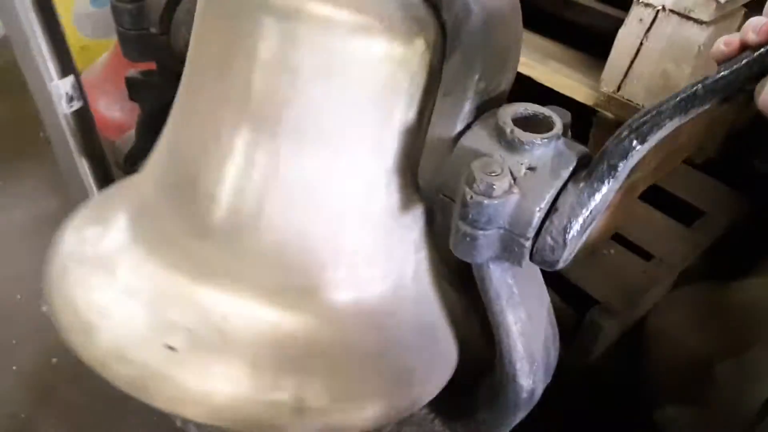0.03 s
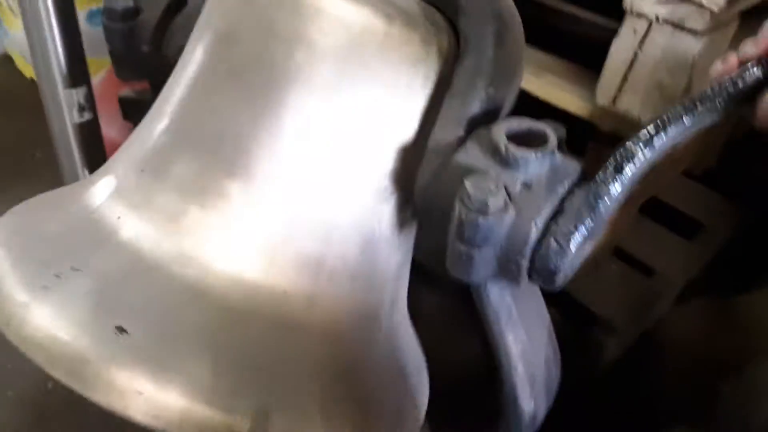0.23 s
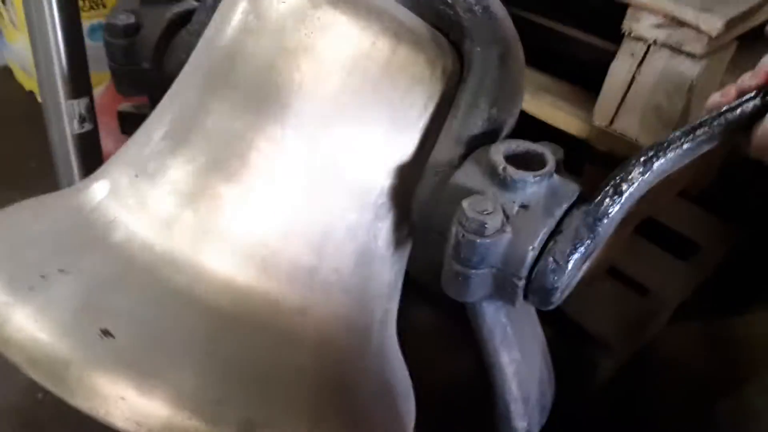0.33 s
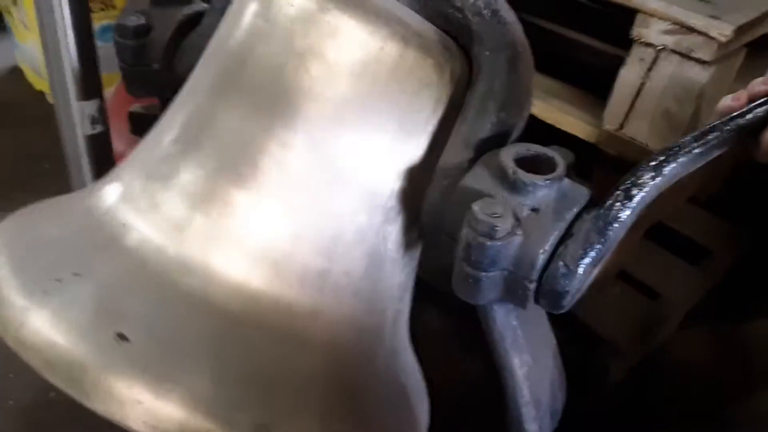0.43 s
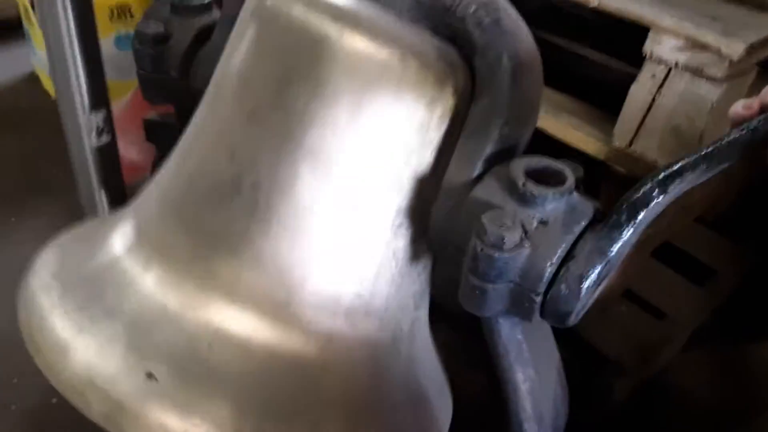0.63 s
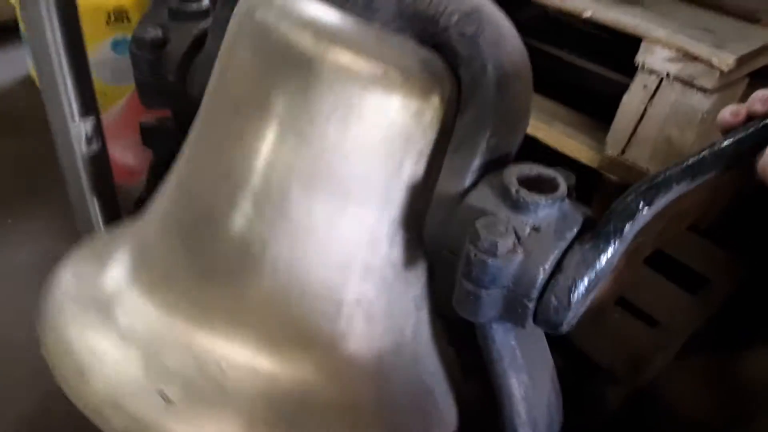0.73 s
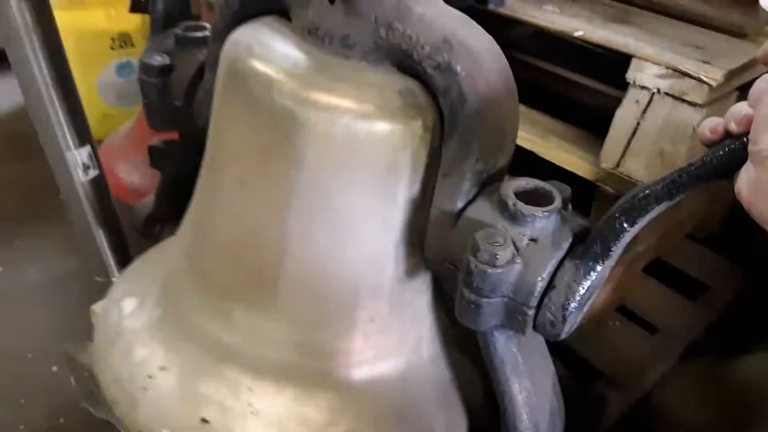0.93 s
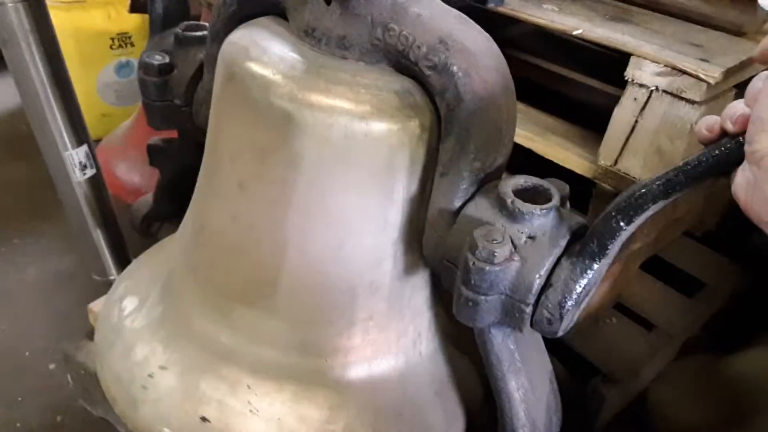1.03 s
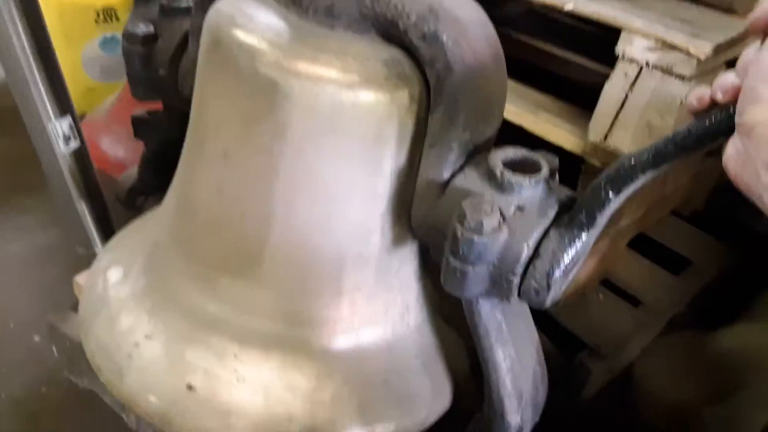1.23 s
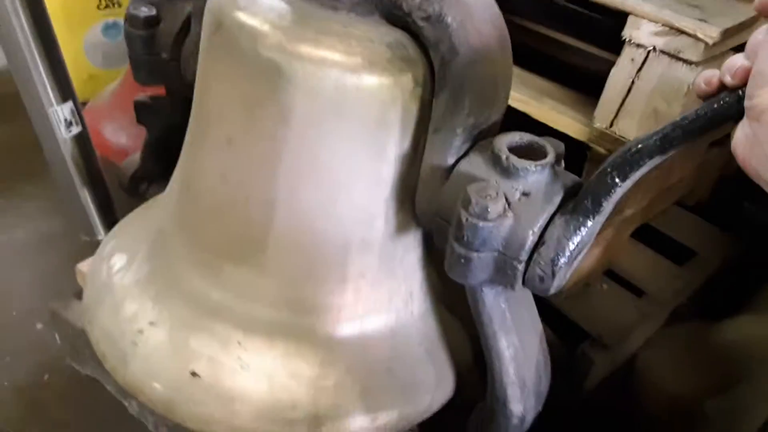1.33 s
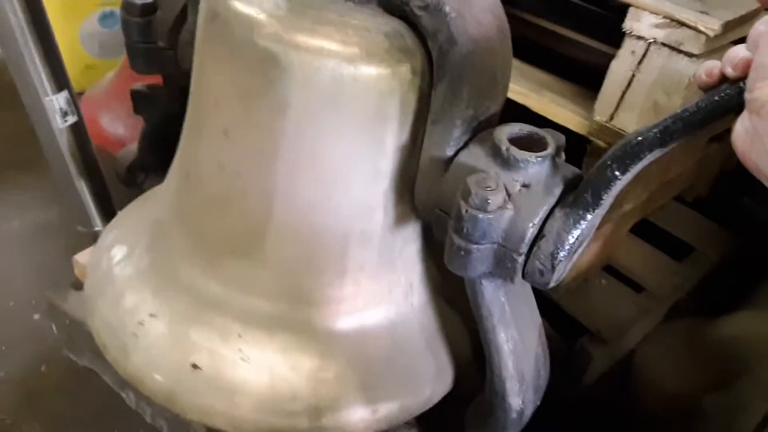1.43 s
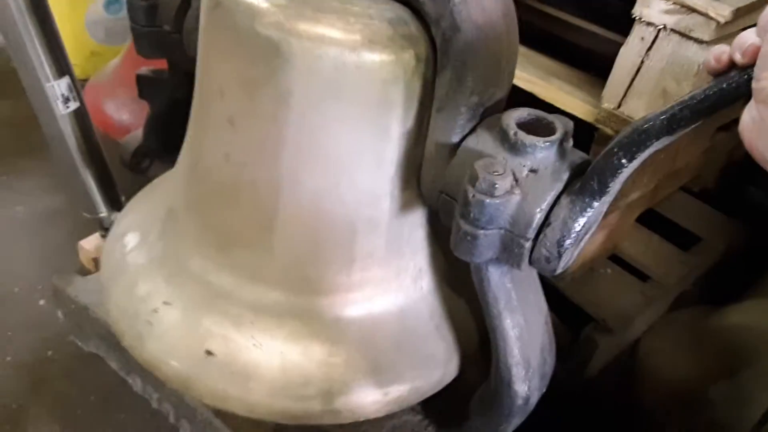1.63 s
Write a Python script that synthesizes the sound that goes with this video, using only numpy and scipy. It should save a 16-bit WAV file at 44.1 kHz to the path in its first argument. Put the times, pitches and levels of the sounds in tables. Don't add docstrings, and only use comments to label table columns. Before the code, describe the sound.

Two clangs of a brass bell, the first piercing and overloaded, the second gentler, with dull knocks

```python
import sys
import numpy as np
from scipy import signal
from scipy.io import wavfile
from scipy.ndimage import uniform_filter1d

SR = 44100
rng = np.random.default_rng(int(sys.argv[2]) if len(sys.argv) > 2 else 0)


def voltage_ratio(decibels):
    exponent = np.asarray(decibels, float) / 20
    return 10 ** exponent


def inscribe(sig):
    pcm = np.round(np.clip(np.atleast_2d(sig).T, -1, 1) * 32767)
    wavfile.write(sys.argv[1], SR, pcm.astype(np.int16))


N = 74970
HARD_S, SOFT_S = 0.223, 0.768


def read(points, hz):
    f, value = np.transpose(points)
    return np.interp(np.log(hz + 1), np.log(f + 1), value)


def after(start):
    t = np.maximum(np.arange(N) / SR - start, 0)
    return t, np.sin(np.pi / 2 * np.minimum(t / 0.0014, 1)) ** 2


# frequency in Hz, coherence from 0 to 1.
COHERENCE = [(60, 0.94), (240, 0.96), (950, 0.22), (3770, 0.08), (15000, 0.09)]


def noise(colour, t60=None):
    size = 1024 if t60 is None else 256
    hz = np.fft.rfftfreq(size, 1 / SR)
    frames = 4 * N // size + 5
    a, b, c, d = rng.standard_normal((frames, len(hz), 4)).T
    like = np.clip(read(COHERENCE, hz), -1, 1)[:, None]
    left = a + 1j * b
    right = like * left + np.sqrt(1 - like ** 2) * (c + 1j * d)
    spectrum = np.array([left, right]) * voltage_ratio(read(colour, hz))[:, None]
    rms = signal.istft(spectrum, nperseg=size)[1].std()
    if t60 is not None:
        seconds = np.arange(frames) * size / 2 / SR
        spectrum = spectrum * voltage_ratio(-60 * seconds / read(t60, hz)[:, None])
    return signal.istft(spectrum, nperseg=size)[1][:, :N] / rms


# frequency in Hz, level in dB.
HUM_COLOUR = [(18, -69), (30, -43), (92, -5.5), (251, -6.5), (445, -12.5), (868, -16.5), (932, -19),
              (1950, -20.5), (9000, -45), (11700, -85), (19800, -120)]


def hum():
    t, _ = after(HARD_S)
    duck = 1 - np.exp(-t / 0.18)
    air = noise(HUM_COLOUR)
    rumble = signal.filtfilt(*signal.butter(2, 180, fs=SR), air)
    air = air - (1 - voltage_ratio(-15 * duck)) * rumble
    port_db = np.array([[1], [-1]])
    return voltage_ratio(-42 - 15 * duck - 7.5 * t + port_db) * air


# start in seconds, level in dB.
KNOCKS = [
    (.24, -30),
    (.39, -44),
    (.87, -53),
    (1.02, -46),
    (1.16, -44),
    (1.29, -49),
    (1.37, -56),
    (.769, -43),
]
# frequency in Hz, level in dB, T60 in seconds.
YOKE_MODES = [(305, 0, .16), (135, -14, .1), (620, -7, .07), (225, -8, .1)]


def yoke():
    out = np.zeros(N)
    for start, knock_db in KNOCKS:
        t, _ = after(start)
        rise = np.minimum(t / 0.0027, 1)
        for hz, mode_db, t60 in YOKE_MODES:
            detune = rng.uniform(0.93, 1.04)
            level = voltage_ratio(knock_db + mode_db - 60 * t / t60)
            out += level * rise * np.sin(2 * np.pi * hz * detune * t)
    return out


# frequency in Hz, level in dB.
CRACK_COLOUR = [(50, -38), (250, -11), (900, -15), (1600, -1), (2300, 0), (4500, -16), (7500, -36),
                (10000, -60)]
# frequency in Hz, T60 in seconds.
CRACK_T60 = [(100, .4), (500, 0.41), (2000, 0.09), (5000, 0.45), (10000, .2)]


def crack(start, tail_db, snap_db):
    t, rise = after(start)
    tail = np.roll(noise(CRACK_COLOUR, CRACK_T60), round(start * SR), axis=1)
    snap = noise(CRACK_COLOUR) * np.exp(-t / 0.0034)
    port_gain = voltage_ratio([[0], [1.5]])
    return rise * port_gain * (voltage_ratio(tail_db) * tail + voltage_ratio(snap_db) * snap)


def haze():
    count = 60
    hz = np.geomspace(700, 6500, num=count)
    level, detune, life = rng.random((count, 3)).T
    db = -4.5 * abs(np.log2(hz / 2000)) - 4.7 * level
    t60 = 1.55 * (0.13 + life) * (1000 / hz) ** 0.3
    return list(zip(hz * (1 + 0.038 * detune), -35.5 + db, -48.5 + db, t60))


# frequency in Hz, hard-blow level in dB, soft-blow level in dB, T60 in
# seconds.
SHORT_PARTIALS = [(2486, -30, -36, .7), (2524, -31, -35, .73), (3745, -27, -38, .6), (3977, -22, -30, .55),
                  (4158, -24, -37, .6), (4477, -26, -43, .97), (4636, -35, -43, .76), (4695, -28, -41, .6),
                  (4757, -28, -45, .79), (5675, -38, -55, .88), (6367, -33, -49, 1.15), (7626, -40, -57, .85),
                  (770, -46, -58, 2.), (1114, -53, -61, 2.), (1540, -30, -48, 1.1), (5846, -37, -49, .57),
                   (6175, -44, -54, .67), (6918, -47, -58, .4), (8339, -56, -72, .8), (8936, -52, -62, .5),
                   (10287, -60, -68, .35)]
MORE_SHORT_PARTIALS = [(7200, -60, -55, .45), (7420, -60, -57, .45), (8060, -60, -55, .15), (8760, -58, -61, .4),
                       (10680, -60, -70, .3), (11650, -62, -66, .15), (3570, -32, -45, 1.2), (1145, -41, -58, 2.),
                       (5555, -50, -50, 1.), (4270, -40, -60, 1.)]


def small(start, blow):
    t = np.arange(N - round(start * SR)) / SR
    out = np.zeros((2, N))
    for hz, *blow_db, t60 in SHORT_PARTIALS + haze() + MORE_SHORT_PARTIALS:
        u = t[:round(1.2 * t60 * SR)]
        lead, place = rng.random((2, 2, 1))
        beat_hz = 1.5 + 5 * rng.random()
        sway = 1 + 0.8 * np.cos(2 * np.pi * (beat_hz * u + place))
        bloom_db = -1.5 * np.exp(-u / 0.057)
        level = voltage_ratio(blow_db[blow] + bloom_db - 60 * u / t60)
        tone = level * sway * np.sin(2 * np.pi * (hz * u + lead))
        out[:, N - len(t):][:, :len(u)] += tone
    return out * after(start)[1]


# frequency in Hz, T60 in seconds.
SIDE_HARD = [(919.61, 12.0), (955.54, 2.93), (1486.44, 1.64), (1499.57, 12.0), (2220.59, 9.98),
             (3092.33, 0.51), (3096.5, 2.74), (4093.27, 1.99), (4099.96, 9.85), (5207.18, 0.64),
             (5214.15, 0.69), (6379.94, 0.57), (5207.31, .64), (1496.51, 12.)]
SIDE_SOFT = [(925.62, 2.65), (956.39, 4.9), (1495.86, 12.0), (1497.42, 1.42), (2224.35, 1.87),
             (3104.51, 0.38), (3095.84, 1.7), (4092.98, 0.73), (4102.99, 0.86), (5198.95, 1.24),
             (5204.74, 1.06), (6389.91, 0.94), (5204.9, .98), (1504.09, 1.65)]
# left level in dB, left starting phase in turns, right level in dB,
# right starting phase in turns.
SIDE_PORTS_HARD = [(-37.0, 0.44, -46.5, 0.47), (-20.5, 0.2, -23.9, 0.63), (-19.5, 0.71, -22.5, 0.35),
                   (-28.0, 0.43, -28.5, 0.68), (-30.0, 0.98, -48.0, 0.69), (-17.0, 0.66, -8.0, 0.83),
                   (-26.0, 0.73, -30.0, 0.26), (-30.0, 0.36, -36.5, 0.69), (-35.5, 0.87, -46.0, 0.17),
                   (-16.0, 0.15, -29.0, 0.78), (-37.5, 0.39, -27.5, 0.91), (-44.5, 0.29, -32.5, 0.02),
                   (-26.0, 0.96, -29.5, .4), (-28.5, 0.01, -30.5, 0.69)]
SIDE_PORTS_SOFT = [(-44.0, 0.15, -42.0, 0.64), (-40.5, 0.42, -51.0, 0.02), (-39.0, 0.035, -49.5, 0.88),
                   (-22.5, 0.21, -29.5, 0.71), (-31.8, 0.78, -36.5, 0.85), (-19.5, 0.76, -30.5, 0.8),
                   (-43.0, 0.63, -34.5, 0.9), (-22.0, 0.63, -27.5, 0.48), (-30.5, 0.12, -28.0, 0.064),
                   (-54.5, 0.66, -38.0, 0.52), (-42.5, 0.92, -48.5, 0.76), (-52.5, 0.32, -59.5, 0.21),
                   (-37.0, .51, -44.0, .09), (-29.5, 0.5, -41.5, 1.0)]


def sides(start, tones, ports):
    t, rise = after(start)
    out = np.zeros((2, N))
    for (hz, t60), port in zip(tones, ports):
        for ch, (db, place) in enumerate(np.reshape(port, (2, 2))):
            out[ch] += voltage_ratio(db - 60 * t / t60) * np.sin(2 * np.pi * (hz * t + place))
    return out * rise


# frequency in Hz, split in Hz, T60 in seconds,
# lead of the left port in turns, its drift as the bell swings in turns per second.
RING_HARD = [(467.0, 1.42, 2.18, 0.2, -0.17), (922.0, 1.9, 11.52, 0.03, 0.1),
             (957.2, 2.07, 11.52, 0.77, -0.06), (1480.0, 6.49, 1.32, 0.59, 0.21),
             (1498.4, 2.55, 8.32, 0.57, 0.24), (1665.0, 1.77, 0.86, 0.36, -1.5),
             (2220.9, 1.19, 1.49, 0.53, 1.5), (2362.3, 0.4, 0.66, 0.05, -0.03),
             (3092.6, 6.95, 2.51, 0.42, 1.5), (3350.2, 1.62, 0.78, 0.65, -0.61),
             (3404.8, 2.31, 0.95, 0.07, 0.34), (4097.1, 1.86, 1.38, 0.3, -1.5),
             (5195.3, 3.14, 1.23, 0.36, -0.35), (6392.2, 0.4, 0.83, 0.09, 0.33)]
RING_SOFT = [(467.4, 0.4, 2.21, 0.15, -0.02), (922.9, 1.1, 2.96, 0.09, -0.02),
             (957.6, 1.71, 6.71, 0.67, -0.11), (1487.1, 0.4, 0.99, 0.07, -1.24),
             (1498.6, 2.3, 2.03, 0.67, 0.16), (1664.4, 0.4, 0.4, 0.1, 0.06),
             (2222.5, 0.85, 1.03, 0.22, -0.25), (2361.8, 1.06, 0.59, 0.62, 0.78),
             (3094.4, 5.28, 1.63, 0.04, 0.07), (3351.9, 0.9, 0.84, 0.63, -1.29),
             (3404.8, 1.46, 0.73, 0.51, -0.18), (4097.2, 0.89, 1.08, 0.96, -1.01),
             (5195.6, 3.29, 1.16, 0.05, 0.31), (6389.8, 0.4, 0.84, 0.28, -0.7)]
# level in dB, partner's amplitude ratio, beat phase at the blow in turns.
LEFT_HARD = [(-22.1, 0.76, 0.37), (-21.9, 1.5, 0.4), (-28.5, 1.85, 0.69), (-24.9, 4.0, 0.31),
             (-21.0, 4.0, 0.56), (-34.2, 0.38, 0.13), (3.1, 0.31, 0.41), (-19.3, 1.23, 0.43),
             (-13.8, 0.5, 0.73), (-13.7, 0.96, 0.3), (-33.5, 0.76, 0.4), (-18.1, 2.86, 0.27),
             (-20.8, 0.27, 0.16), (-26.4, 1.16, 0.48)]
RIGHT_HARD = [(-24.8, 0.74, 0.34), (-27.2, 2.36, 0.32), (-16.1, 0.63, 0.33), (-27.4, 4.0, 0.8),
              (-14.6, 1.01, 0.1), (-44.0, 1.45, 0.23), (-8.0, 1.93, 0.33), (-19.6, 0.98, 0.46),
              (-23.3, 4.0, 0.93), (-14.7, 1.31, 0.42), (-36.8, 3.44, 0.72), (-16.7, 0.53, 0.37),
              (-32.1, 2.63, 0.18), (-27.9, 1.26, 0.43)]
LEFT_SOFT = [(-29, 0.54, 0.41), (-30.5, 0.95, 0.77), (-39.5, 2.4, 0.89), (-16, 1.6, 0.36),
             (-25, 2.56, 0.37), (-17, 1, 0.38), (-5.5, 0.43, 0.39), (-26.5, 0.5, 0.27), (-23.5, 1, 0.74),
             (-26, 0.87, 0.19), (-38.5, 1.4, 0.51), (-23, 2, 0.24), (-37.5, 0.2, 0.22), (-46.5, 2.1, 0.29)]
RIGHT_SOFT = [(-32, 0.55, 0.4), (-35.5, 2.5, 0.68), (-31, 0.55, 0.23), (-21.5, 1, 0.3), (-22, 1.36, 0.93),
              (-21.5, 0.21, 0.43), (-8.5, 0.044, 0.59), (-26.5, 1.5, 0.45), (-26.5, 1.33, 0.61),
              (-23, 0.15, 0.27), (-43.5, 3.9, 0.043), (-24.5, 0.7, 0.3), (-44.5, 3.55, 0.21),
              (-48.5, 1.5, 0.2)]


def pairs(start, ahead_s, ring, left, right):
    t, rise = after(start)
    out = np.zeros((2, N))
    for (hz, split, t60, lead, drift), *ports in zip(ring, left, right):
        for ch, (db, share, place) in enumerate(ports):
            turns = hz * (t + ahead_s)
            if ch == 0:
                turns = turns + lead + drift * t
            tone = np.sin(2 * np.pi * turns)
            partner = share * np.sin(2 * np.pi * (turns + split * t + place))
            out[ch] += voltage_ratio(db - 60 * t / t60) * (tone + partner)
    return out * rise


def flutter():
    b, a = signal.butter(1, 45, fs=SR)
    shimmer = signal.lfilter(b, a, rng.standard_normal((2, N)))
    shimmer = signal.lfilter(b, a, shimmer)
    return 1 + voltage_ratio(-25.5) * shimmer / shimmer.std()


# time in seconds, left level in dB.
LEFT_LEVEL = [
    (.223, 1.8),
    (.33, 2),
    (.39, -.3),
    (.415, -3),
    (.5, -.7),
    (.71, 0),
    (.767, -3.5),
]


def bell():
    t, _ = after(HARD_S)
    first = pairs(HARD_S, 0.004, RING_HARD, LEFT_HARD, RIGHT_HARD)
    first *= voltage_ratio(-1.5 * np.exp(-t / 0.022))
    first[0] *= voltage_ratio(np.interp(HARD_S + t, *np.transpose(LEFT_LEVEL)))
    first += sides(HARD_S, SIDE_HARD, SIDE_PORTS_HARD)
    second = pairs(SOFT_S, 0.04, RING_SOFT, LEFT_SOFT, RIGHT_SOFT)
    second += sides(SOFT_S, SIDE_SOFT, SIDE_PORTS_SOFT)
    ringing = (first * (1 - after(SOFT_S)[1]) + second) * flutter()
    hard_crack = crack(HARD_S, tail_db=-17, snap_db=-5)
    soft_crack = crack(SOFT_S, tail_db=-34, snap_db=-16)
    duller = signal.butter(2, [160, 5000], "band", fs=SR)
    soft_crack = signal.lfilter(*duller, soft_crack)
    return ringing + small(HARD_S, 0) + hard_crack + small(SOFT_S, 1) + soft_crack


def scene():
    return hum() + yoke() + bell()


def band_limit(x):
    return signal.sosfilt(signal.butter(12, 15570, fs=SR, output="sos"), x)


def record(dry):
    power = uniform_filter1d((dry ** 2).mean(0), size=200)
    dry = dry * (1 - 0.7 * (power - uniform_filter1d(power, size=1500)))
    bend = 0.016 * (dry ** 2 - uniform_filter1d(dry ** 2, size=400))
    clipped = np.clip(dry + bend, -1, 1)
    edge = signal.firwin(255, 15600, window=("kaiser", 9), fs=SR)
    mix = signal.oaconvolve(clipped, edge[None], "same")
    return band_limit(mix)


dry = scene()
out = record(dry)
inscribe(out)
```